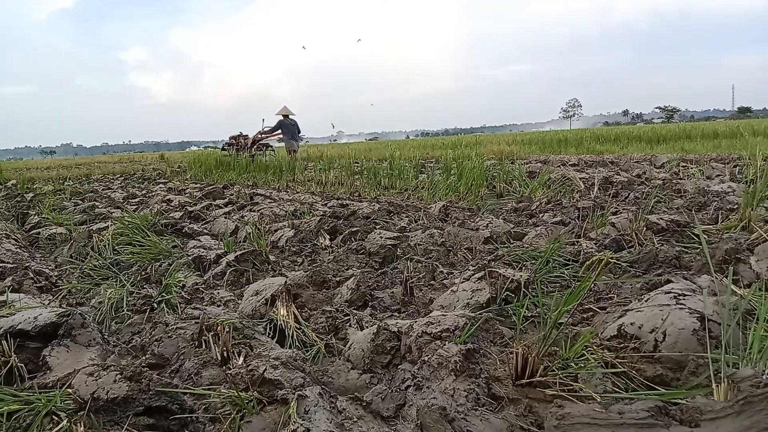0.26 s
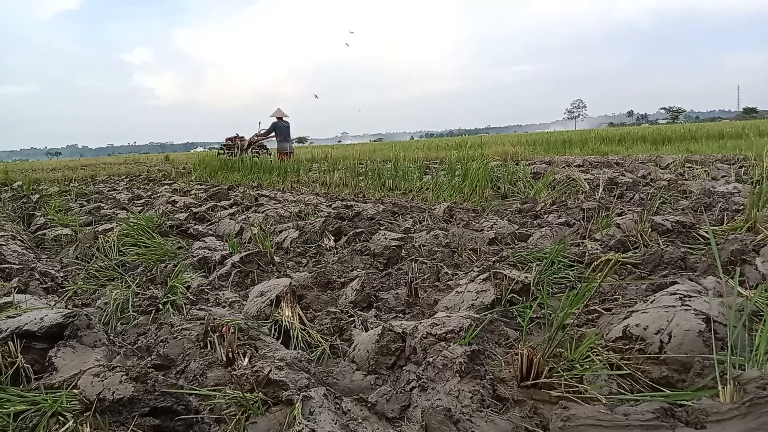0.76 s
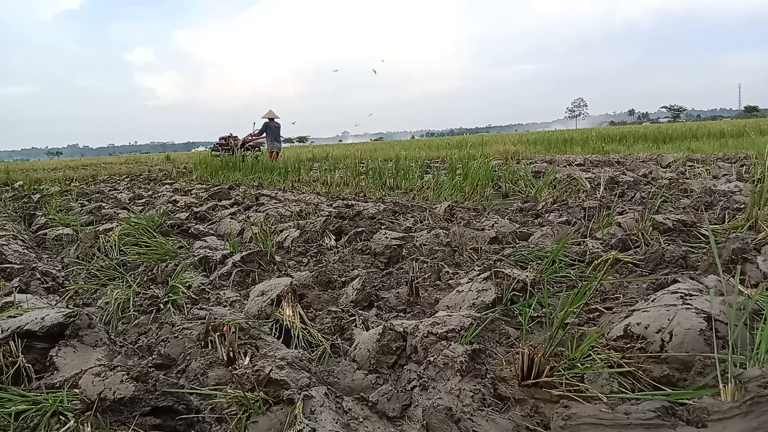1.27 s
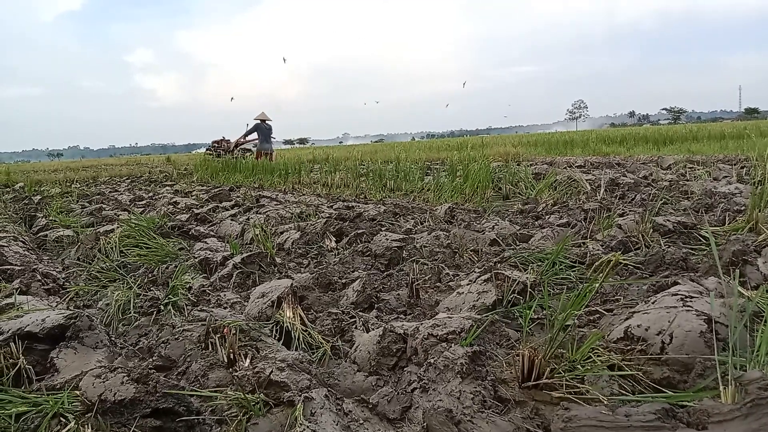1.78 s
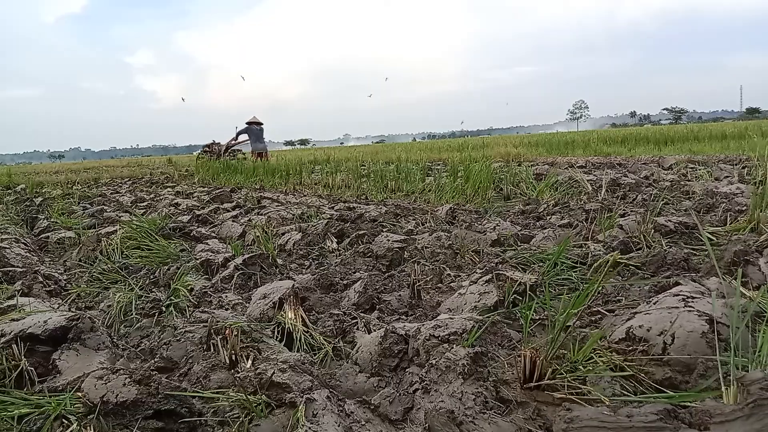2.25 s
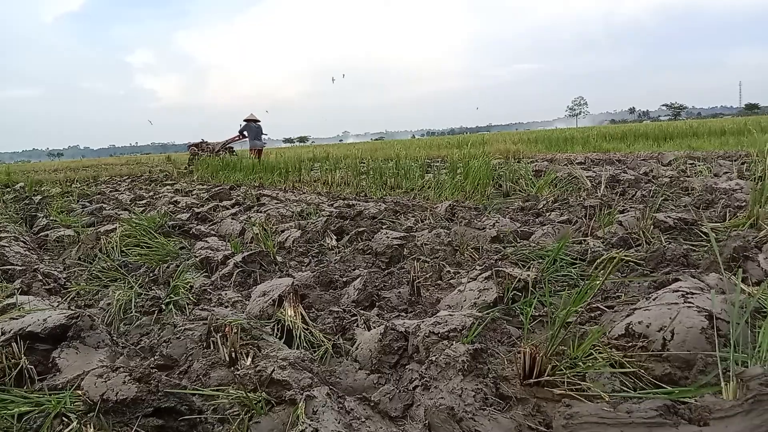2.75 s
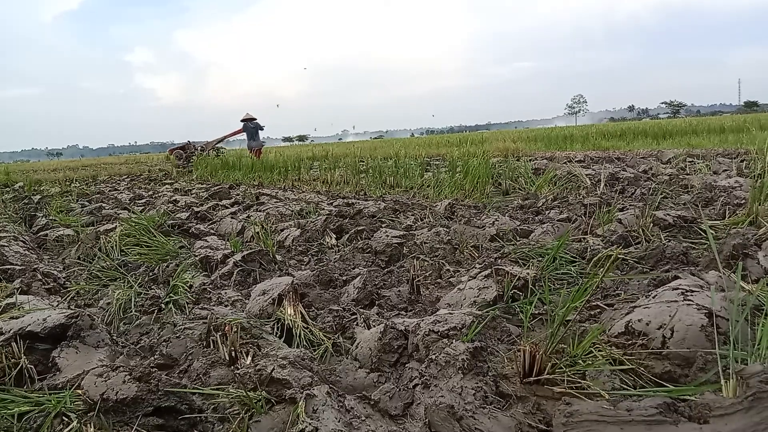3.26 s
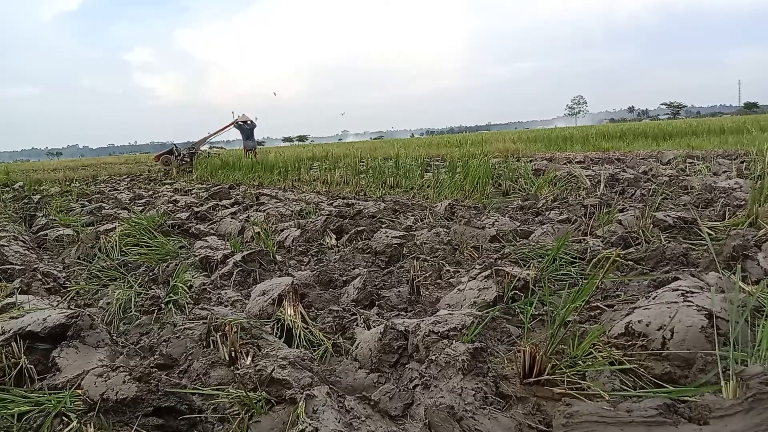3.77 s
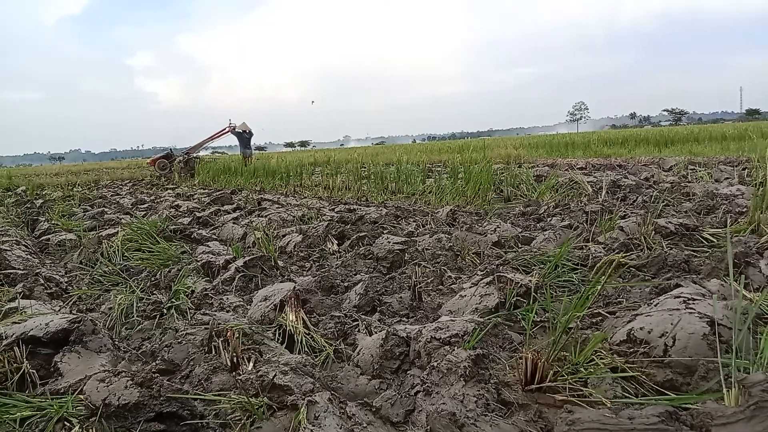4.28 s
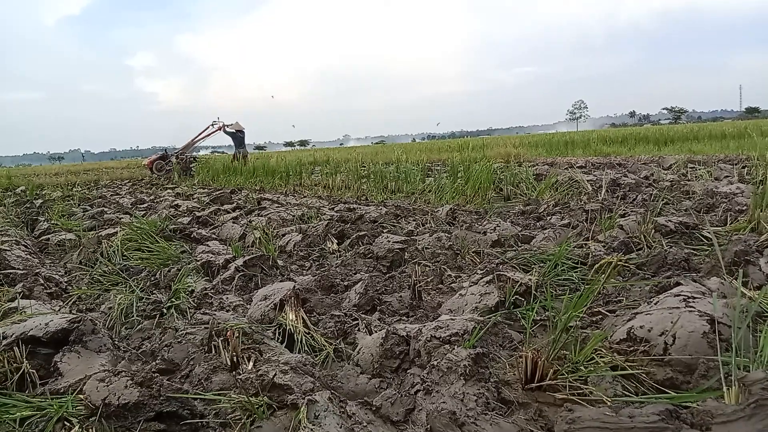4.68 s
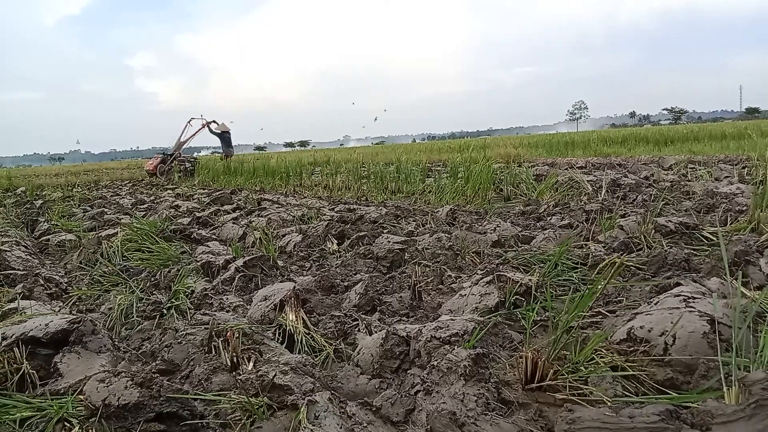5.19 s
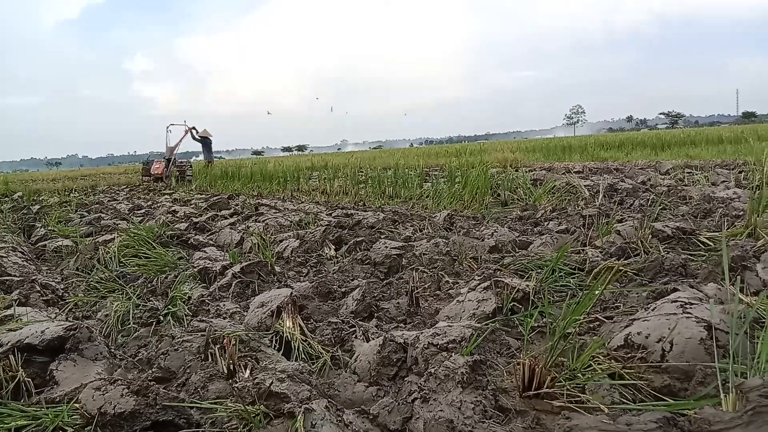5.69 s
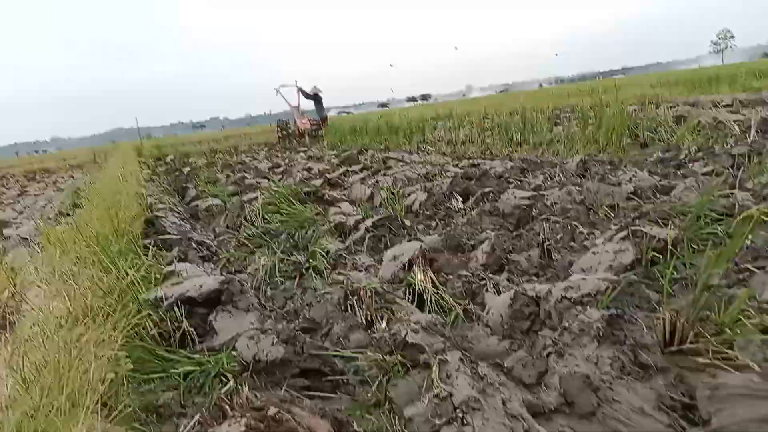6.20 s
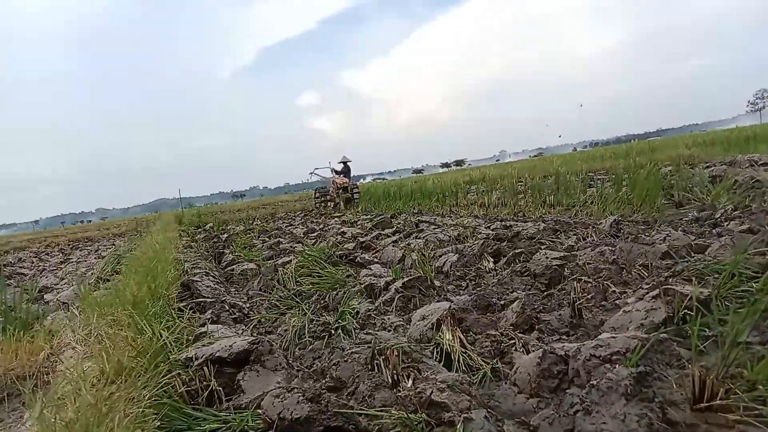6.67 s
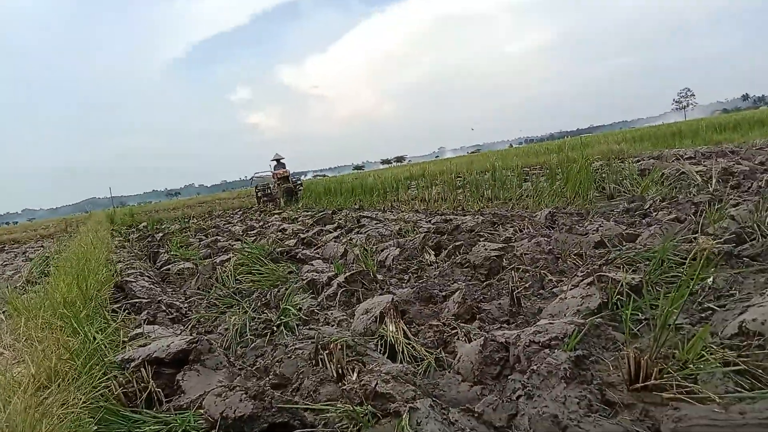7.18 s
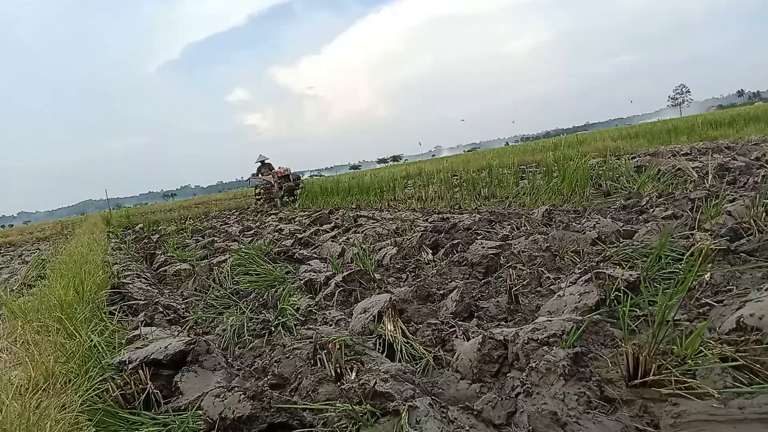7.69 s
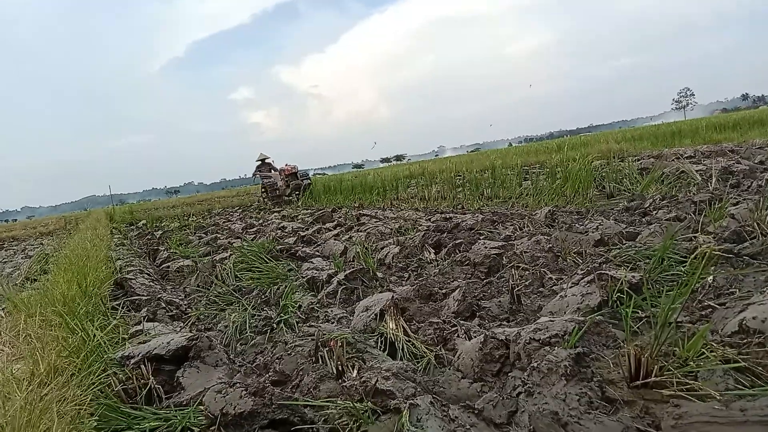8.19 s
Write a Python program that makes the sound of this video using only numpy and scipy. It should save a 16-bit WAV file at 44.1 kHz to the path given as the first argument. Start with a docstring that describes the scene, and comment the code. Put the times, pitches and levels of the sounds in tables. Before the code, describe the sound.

Distant one-cylinder diesel putters with metallic rattle, dips quiet mid-turn and returns louder, while wind thumps the microphone and a cricket chirps faintly.

```python
"""A one-cylinder diesel walk-behind tractor turns at the far end of a muddy field, heard on a hand-held phone.
Firing and exhaust blow-down excite decaying pipe modes; noise bursts at four strokes a cycle ring the metal
parts over a steady gear hum. Wind buffets the microphone as swelling low noise with short pressure pushes,
a cricket chirps in trains of falling tones, and the grip on the phone shifts in a few filtered noise taps.
A faint open-air wash of shaped noise lies beneath."""
import sys
import numpy as np
from scipy import signal
from scipy.fft import rfft, irfft
from scipy.io import wavfile
from scipy.ndimage import uniform_filter1d

SR = 44100
rng = np.random.default_rng(int(sys.argv[2]) if len(sys.argv) > 2 else 0)


def gain_from_db(level_db):
    """Turn a decibel level (scalar or array-like) into a linear amplitude factor."""
    decades = np.asarray(level_db, float) / 20
    return 10 ** decades


def dump(signal):
    """Clip the signal to [-1, 1] and save it as 16-bit WAV at the path in sys.argv[1]."""
    limited = np.clip(np.atleast_2d(signal).T, -1, 1)
    pcm = np.round(limited * 32767).astype(np.int16)
    wavfile.write(sys.argv[1], SR, pcm)


N = 372644
T = np.arange(N) / SR


def columns(table):
    """Linear interpolation: every column of a curve at every sample."""
    s, *cols = np.transpose(table)
    return [np.interp(T, s, c) for c in cols]


def unit(x):
    """Normalization to an rms of 1."""
    return x / np.sqrt(np.mean(x ** 2))


def steady(x):
    """Level compensation: divide out the running rms over a few engine cycles."""
    return x / np.sqrt(uniform_filter1d(x ** 2, SR // 3) + 1e-9)


def band(x, lo_hz, hi_hz, order=2):
    """Band limitation by a Butterworth band-pass."""
    edges_hz = [lo_hz, min(hi_hz, .45 * SR)]
    return signal.sosfilt(signal.butter(order, edges_hz, "bandpass", fs=SR, output="sos"), x)


def walk(rate):
    """Random modulation: levels held 1 / rate s and slewed twice, with a spread near 1."""
    k = int(SR / rate)
    held = np.repeat(rng.standard_normal(N // k + 1), k)
    return 1.163 * uniform_filter1d(uniform_filter1d(held, k), k)[:N]


def crank_bell(cycle, at, spread):
    """Periodic weighting: a Gaussian bell about one crank place (0-1) in every cycle."""
    return np.exp(-((cycle % 1 - at) / spread) ** 2)


def kicks(cycle, place, scatter_db, jitter_s):
    """Impulsive excitation: one impulse a cycle at a crank place, uneven in size and time."""
    s = np.interp(np.arange(1, cycle[-1] + 1) + place, cycle, T, left=-1, right=-1)
    chance = rng.standard_normal((len(s), 2))
    at = ((s + jitter_s * chance[:, 0]) * SR).astype(int)
    keep = (at > 0) & (at < N)
    out = np.zeros(N)
    out[at[keep]] = gain_from_db(scatter_db * chance[keep, 1])
    return out


# engine speed: time_s, firings_per_s
ENGINE_SPEED = [(0.0, 12.146), (1.27, 12.148), (2.04, 10.623), (3.62, 10.579), (4.6, 10.166), (5.5, 10.277),
                (6.18, 10.548), (7.26, 9.691), (7.75, 9.675), (8.45, 9.99)]
CYCLE_AT_START = .68


def crank_cycle():
    """Phase is the integral of rate: engine cycles turned so far, and the slowing in firings per s^2."""
    speed, = columns(ENGINE_SPEED)
    cycle = CYCLE_AT_START + np.cumsum(speed) / SR
    slowing = np.clip(-uniform_filter1d(np.gradient(speed) * SR, SR // 5), 0, None)
    return cycle, slowing


# engine load, under which firing outweighs blow-down: time_s, firing_over_blow_down_db
LOAD = [(0, 6.5), (1.25, 5.5), (1.6, -4), (6.9, 2.5), (8.45, 3.5)]
# modes of the exhaust pipe: pitch_hz, t60_s, swing_after_firing, swing_after_blow_down
PIPE_MODES = [(98, .15, -1.34, -.85), (134, .16, .21, 2.06), (186, .068, 2.18, -1.2), (223, .09, .1, .62),
              (247, .073, -1.24, .29)]
# crank places of the firing and blow-down kicks: place_in_cycle
PIPE_KICK_AT = [-.042, .218]
PUFF_SCATTER_DB, MODE_SCATTER_DB, PIPE_WAVER_DB = 1.8, 3.2, 2.2
# gas still flowing after blow-down: level against the thumps (dB), crank place and spread (0-1)
FLOW_DB, FLOW_AT, FLOW_SPREAD = -4.5, 0.5, 0.3
# the pipe falls quiet just before firing: depth (dB), crank place and spread (0-1)
HUSH_DB, HUSH_AT, HUSH_SPREAD = 7, .89, .05


def exhaust(cycle):
    """Modal response: two pressure kicks a cycle ring the damped pipe modes, over turbulent flow noise."""
    t = T[:SR // 5]
    load_db, = columns(LOAD)
    fire, blow = (kicks(cycle, at, PUFF_SCATTER_DB, 0.00029) * gain_from_db(sign * load_db / 2)
                  for at, sign in zip(PIPE_KICK_AT, (1, -1)))
    thumps = np.zeros(N)
    onset = 1 - np.exp(-t / .001)  # the gas takes a millisecond to arrive
    for hz, t60, after_fire, after_blow in PIPE_MODES:
        decay = np.sin(2 * np.pi * hz * t) * np.exp(-np.log(1000) * t / t60) * onset
        # the outlet swings about, so each mode reaches the ear a little differently
        waver = gain_from_db(PIPE_WAVER_DB * walk(2.99))
        push = gain_from_db(MODE_SCATTER_DB * walk(40)) * (after_fire * fire + after_blow * blow)
        thumps += waver * signal.fftconvolve(push, decay)[:N]
    flow = crank_bell(cycle, FLOW_AT, FLOW_SPREAD) * unit(band(rng.standard_normal(N), 110, 175))
    hush = gain_from_db(-HUSH_DB * crank_bell(cycle, HUSH_AT, HUSH_SPREAD))
    return unit(band(hush * (unit(thumps) + gain_from_db(FLOW_DB) * flow), 39, 316, order=3))


# crank places of firing, exhaust opening, overlap and intake closing: place_in_cycle
STROKE_AT = [-.018, .225, .5, .755]
# knock over the steady rattle (dB), before each part takes its share
FIRE_DB, EXHAUST_VALVE_DB, OVERLAP_DB, INTAKE_VALVE_DB = 15, 12, 4, 6.5
# firing knocks harder under load (dB per dB)
KNOCK_PER_LOAD, KNOCK_DRIFT_DB = .3, 1.5
# less fuel burns while the engine slows: knock lost (dB) per squared slowing in firings per s^2
COAST_DB = 3.5
# each stroke swells fast and dies slower: time to its crest, rise and fall (s)
BURST_PEAK_S, BURST_RISE_S, BURST_FALL_S = .0025, .0014, .0026


def stroke_blows(cycle, slowing):
    """Impact excitation: at each of four strokes, a swell for noise and a knock that repeats every cycle."""
    firing_db = FIRE_DB + KNOCK_PER_LOAD * columns(LOAD)[0] - COAST_DB * slowing ** 2
    fire_db, out_db, in_db = (db + KNOCK_DRIFT_DB * walk(2.047)
                              for db in (firing_db, EXHAUST_VALVE_DB, INTAKE_VALVE_DB))
    t = T[:SR // 20]
    width_s = np.where(t < BURST_PEAK_S, BURST_RISE_S, BURST_FALL_S)
    burst = np.exp(-((t - BURST_PEAK_S) / width_s) ** 2)
    hits = [np.clip(gain_from_db(db) - 1, 0, None) * kicks(cycle, at, 2.1, 0.00061)
            for at, db in zip(STROKE_AT, [fire_db, out_db, OVERLAP_DB, in_db])]
    swells = [signal.fftconvolve(hit, burst)[:N] for hit in hits]
    # the same parts meet on every cycle, so each stroke has one fixed noise shape
    knocks = [signal.fftconvolve(hit, burst * rng.standard_normal(len(t)))[:N] for hit in hits]
    return swells, knocks


# half-widths of skirt and crest of a resonance, as shares of its width
SKIRT, CREST = .65, .25


def peak(x, hz, width_hz):
    """Resonance: a steep band with a sharp crest in its middle, which rings on after a blow."""
    skirt, crest = (signal.butter(order, [max(hz - w, hz / 2), hz + w], "bandpass", fs=SR, output="sos")
                    for order, w in ((3, SKIRT * width_hz), (1, CREST * width_hz)))
    return signal.sosfilt(np.vstack([skirt, crest]), x)


# moments of the turn at which the machine shows another side: time_s
HEADING_S = [.7, 2.2, 3.5, 5.2, 6.2, 7.6]
# the resonances bend up and down: wander of their delay (s), changes per s
SWAY_S, SWAY_PER_S = .0009, 16


def ring(x, modes, waver_db, sway_s):
    """Modal superposition: alternate signs leave notches; levels follow the turn and waver, pitches bend."""
    out = np.zeros(N)
    for k, (hz, width_hz, *heading_db) in enumerate(modes):
        level_db = np.interp(T, HEADING_S[:len(heading_db)], heading_db) + waver_db * walk(14)
        # a steep band answers about 1 / (2 width) s late, so it is moved forward to meet the blow
        mode = unit(np.roll(peak(x, hz, width_hz), -int(SR / (2 * width_hz))))
        if sway_s:
            mode = np.interp(T - sway_s * walk(SWAY_PER_S), T, mode)
        out += (-1) ** k * gain_from_db(level_db) * mode
    return out


def struck_part(cycle, blows, modes, shares, grain_db, rest_db, rest_spread, waver_db, sway_s):
    """Forced vibration: grainy noise swells with a share of each stroke and rings on in one part."""
    swells, knocks = blows
    # both valves rest between overlap and intake closing, and the rattle thins
    rattle = gain_from_db(grain_db * walk(300) - rest_db * crank_bell(cycle, .64, rest_spread))
    swell = rattle + 0.66 * sum(share * stroke for share, stroke in zip(shares, swells))
    knock = 0.72 * sum(share * stroke for share, stroke in zip(shares, knocks))
    drive = rng.standard_normal(N) * swell + knock
    return ring(drive, modes, waver_db, sway_s) * np.std(drive)


# resonances of the engine block: pitch_hz, width_hz, level_db
BLOCK_MODES = [(4333, 377, -13.5), (4629, 122, -12.5), (5000, 456, -7.5), (5446, 423.4, -5),
               (5898, 354.7, -9), (6324, 664, -9.5), (7150, 1150, -17.5), (8630, 1700, -26),
               (10310, 1150, -34)]


def block(cycle, blows):
    """Structure-borne sound: all four strokes shake the block, at pitches that stay put."""
    return struck_part(cycle, blows, BLOCK_MODES, (0.91, 1.1, 0.65, 1.06), 3.07, 3.5, 0.087, 1.93, 0)


# resonances of the covers: pitch_hz, width_hz, level_db at each of six headings
COVER_MODES = [(2362, 286, -12.5, -13.5, -22, -22.5, -32.5, -45),
               (2693, 130, -19.5, -31, -13, -23.5, -27.5, -19.5),
               (3010, 233.4, -8, -15, -31.5, -29, -24, -13.5), (3282, 200, -8.5, -12, -6.5, -14, -24, -67),
               (3756, 469, -10.5, -14, -15, -20, -17.5, -14)]


def covers(cycle, blows):
    """Plate resonance: firing and intake closing ring the covers hardest, and their pitches sway a little."""
    return struck_part(cycle, blows, COVER_MODES, (1.0, 0.55, 0.1, 1.6), 2.25, 10.0, .15, 4.2, SWAY_S / 4)


# resonances of the sheet metal: pitch_hz, width_hz, level_db at each of six headings or one for all
SHEET_MODES = [(10193, 906, -7, -21, -13, -9, -14, 4), (12200, 1900, 0.37), (15000, 950, -1.3),
               (15000, 1500, -1.7)]


def sheet_metal(cycle, blows, level_db):
    """Amplitude modulation: fine treble rattle swells as spent gas hisses on through the exhaust stroke."""
    rattle = struck_part(cycle, blows, SHEET_MODES, (1.2, 0.9, 1.0, 0.1), 3.0, 4.0, .12, 3.0, 0)
    # more gas on some cycles than on others
    outflow = gain_from_db((7.0 + 3.0 * walk(9)) * crank_bell(cycle, .24, 0.22))
    return gain_from_db(level_db + 2.5 * walk(5)) * steady(outflow * rattle)


# resonances of the gearbox: pitch_hz, width_hz, level_db at each of six headings
GEARBOX_MODES = [(810, 1330, -27, -61, -55, -34, -26.5, -46), (1134, 263.4, 0.5, -8, -12, -8.5, -17, -15.5),
                 (1300, 157, 1.5, 4.5, 1, 1.5, -3, -2), (1478, 173.2, -2, -6.5, -5.5, -25, -8, -10.5),
                 (1747, 326, -3.5, -14, -8, -12.5, -17, -15.5)]


def gearbox(cycle, blows, level_db):
    """Forced resonance: gear noise hums in swaying modes, its level held steady over a few cycles."""
    hum = struck_part(cycle, blows, GEARBOX_MODES, (0.21, 0.28, 0.42, 1.5), 1.5, 2.5, 0.11, 2.44, SWAY_S)
    return gain_from_db(level_db) * steady(hum)


# the moving hand shades the port and the treble dips: centre_s, dip_db, length_s
HAND_SHADE = [(6.02, 2, .012), (6.218, 4.5, 0.035), (6.423, 3, 0.016), (6.54, 2, 0.022)]


def clatter(cycle, slowing, gears_db, sheet_db):
    """Superposition: four struck parts sound together; a hand over the port shadows all but the gearbox."""
    blows = stroke_blows(cycle, slowing)
    treble = block(cycle, blows) + covers(cycle, blows) + sheet_metal(cycle, blows, sheet_db)
    dip_db = sum(db * np.exp(-((T - s) / length) ** 2) for s, db, length in HAND_SHADE)
    return gain_from_db(-dip_db) * treble + gearbox(cycle, blows, gears_db)


# loudness of the machine at the phone: time_s, level_db
ENGINE_LEVEL = [(0, -34.5), (.6, -32.5), (1.1, -32), (1.55, -36.5), (2.36, -37.5), (2.7, -41.5),
                (3.0, -39.5), (3.49, -33.5), (4.2, -37.5), (4.9, -42), (5.8, -45), (6.11, -37.5),
                (6.98, -30), (7.29, -33), (7.7, -29.5), (8.45, -28.5)]
# what points at the phone during the turn, over that loudness:
# time_s, exhaust_outlet_db, gearbox_db, sheet_metal_db
FACING = [(0, 8, 5, -10.5), (1.3, 7, 6, -17), (1.8, 0.5, 5.5, -28), (2.65, 3, 2, -24), (2.95, 3, 8, -26),
          (3.6, 4, 1, -30), (4.2, 5, -6, -22.5), (4.9, 8.5, -0.5, -18.5), (5.8, 13, 1.5, -18.5),
          (6.2, 7, 4, -15), (6.7, -3.5, -3, -26), (7.4, 3, -1, -23.5), (8.45, -3, 2, -20.5)]


def engine():
    """Directivity: the balance of exhaust, gears and sheet metal changes as the machine turns."""
    cycle, slowing = crank_cycle()
    level_db, = columns(ENGINE_LEVEL)
    outlet_db, gears_db, sheet_db = columns(FACING)
    return gain_from_db(level_db) * (gain_from_db(outlet_db) * exhaust(cycle) + clatter(cycle, slowing, gears_db, sheet_db))


# spectrum of the open air, before its overall level is set: pitch_hz, density_db (per Hz)
AIR_SPECTRUM = [(40, -7), (110, .1), (400, -30), (800, -29), (2000, -54), (6000, -48), (15000, -50)]
FIELD_DB = -47


def field():
    """Spectral shaping: white noise filtered to a faint open-air wash that flutters with the breeze."""
    hz, db = np.transpose(AIR_SPECTRUM)
    f = np.fft.rfftfreq(N, 1 / SR)
    shape = gain_from_db(np.interp(np.log(f + 1), np.log(hz), db))
    wash = irfft(rfft(rng.standard_normal(N)) * shape, N)
    return gain_from_db(FIELD_DB) * unit(wash * gain_from_db(6.5 * walk(5.3)))


# wind on the microphone: crest_s, rumble_level_db, length_s
GUSTS = [(1.127, -31, 0.12), (1.182, -32, 0.077), (1.314, -21.5, 0.12), (1.453, -19, 0.034),
         (1.412, -15, 0.053), (1.519, -15.5, 0.085), (2.044, -27, 0.077), (2.408, -25.5, 0.095),
         (3.377, -30, 0.073), (3.689, -23, 0.032), (3.883, -20.5, 0.12), (4.044, -36, 0.099),
         (4.689, -17.5, 0.1), (6.187, -34, 0.077), (6.316, -21.5, 0.033), (6.383, -20.5, .077),
         (7.248, -20, 0.16), (7.667, -26.5, 0.071), (7.905, -22, 0.037), (8.047, -24, 0.056),
         (8.201, -22, 0.16), (8.3, -29, 0.18)]
# single eddies that slap the port, before filtering and gain: start_s, level_db, push_s
POPS = [(1.407, -28, .0009), (1.417, -7, 0.00089), (1.511, -7, 0.00037), (3.86, -10.5, 0.00076),
        (3.89, -15, 0.00093), (4.683, -18, 0.00073), (6.384, -10.5, 0.00032), (7.167, -19, 0.0009),
        (7.215, -11, 0.00089), (7.231, -11.5, 0.0009), (7.257, -8, 0.0011), (7.65, -11.5, 0.0016),
        (8.198, -12.5, 0.00093), (8.283, -28, 0.00083)]
# the ragged edge grows with the gust: share at a -15 dB gust (dB), growth (dB per dB)
EDGE_DB, EDGE_SLOPE = -5, 1.2


def wind():
    """Turbulent pressure: gusts are lumpy low rumble, ragged at the crest; eddies pop as short pushes."""
    rumble = band(rng.standard_normal(N), 75.5, 143.0) * gain_from_db(2.0 * walk(50))
    edge = band(rng.standard_normal(N), 164, 446, order=4) * gain_from_db(3.9 * walk(40))
    out = np.zeros(N)
    for s, db, length in GUSTS:
        near = slice(int((s - length) * SR), int((s + length) * SR))
        swell = np.exp(-((T[near] - s) / (0.31 * length)) ** 2)
        # both parts are brought to rms 1 under the swell
        low, high = (x / np.sqrt(np.average(x ** 2, weights=swell ** 2)) for x in (rumble[near], edge[near]))
        ragged = gain_from_db(EDGE_DB + EDGE_SLOPE * (db + 15.0)) * swell * high
        out[near] += gain_from_db(db) * swell * (low + ragged)
    pushes = sum(-gain_from_db(db) * np.exp(-((T - s - .001) / push) ** 2) for s, db, push in POPS)
    return band(out + 1.98 * band(pushes, 85, 1170), 38, 860, order=6)


# first chirp (s), first gap (s), each gap longer by (s), number of chirps
SONG_S, CHIRP_GAP_S, SLOWING_S, SONG_CHIRPS = 3.089, .1195, .0008, 23
# full voice (dB, before a doubling of amplitude), softness at the start (dB), warm-up (s)
SONG_DB, SHY_DB, WARM_UP_S = -51, -10, 0.7
CHIRP_SCATTER_S, WING_SCATTER_DB = .005, 1.2


def cricket():
    """Stridulation: each chirp is a train of 13 wing strokes, and every stroke falls in pitch."""
    out = np.zeros(N)
    t = T[:int(.0062 * SR)]
    stroke = np.hanning(len(t)) * np.sin(2 * np.pi * (9150 * t - 75000 * t ** 2))
    k = np.arange(SONG_CHIRPS)
    since = CHIRP_GAP_S * k + SLOWING_S * k * (k - 1) / 2
    starts = SONG_S + since + CHIRP_SCATTER_S * rng.standard_normal(SONG_CHIRPS)
    voice_db = SONG_DB + SHY_DB * np.exp(-since / WARM_UP_S)
    for s, db, chance in zip(starts, voice_db, rng.standard_normal((SONG_CHIRPS, 13))):
        n = np.arange(len(chance))
        at = ((s + .0081 * n + .0002 * chance) * SR).astype(int)
        swell = np.minimum((n + 2) / 7, 1)  # the first strokes are softer
        out[at] += gain_from_db(db + WING_SCATTER_DB * chance) * swell
    return 2 * signal.fftconvolve(out, stroke)[:N]


# fingers on the phone: start_s, peak_level_db, decay_s, centre_hz, width_hz
FINGERS = [(5.876, -21.5, 0.00073, 7360, 5900), (5.945, -45, .04, 13300, 3500),
           (6.047, -41, 0.054, 12800, 4500), (6.115, -36, .04, 12900, 4500),
           (6.262, -33, 0.041, 12500, 4500), (6.327, -3, 0.017, 5320, 1300),
           (6.33, -30.5, 0.029, 12600, 5000), (6.334, -13, 0.044, 5000, 1610),
           (6.372, -19, 0.013, 4600, 4020), (6.387, -9.5, 0.00085, 2000, 6040)]


def grip():
    """Structure-borne transmission: taps and a short scrape reach the microphone through the case."""
    out = np.zeros(N)
    for (s, db, length, hz, width_hz), noise in zip(FINGERS, rng.standard_normal((len(FINGERS), SR // 4))):
        t = T[:len(noise)]
        push = noise * np.minimum(t / (0.16 * length), 1) * np.exp(-t / length)
        tap = band(push, max(hz - width_hz / 2, 90), hz + width_hz / 2, order=3)
        i = int(s * SR)
        out[i:i + len(t)] += gain_from_db(db) * tap / np.abs(tap).max()
    return out


def scene():
    """Linear superposition: engine, open air, wind, cricket and hands in one channel."""
    return (engine() + field() + wind() + cricket() + grip())[None]


def band_limit(x):
    """A steep low-pass at the top of the band."""
    return signal.sosfilt(signal.butter(12, 16680, fs=SR, output="sos"), x)


def record(dry):
    """Band limitation: the phone cuts the deepest bass and the very top."""
    thin = signal.sosfilt(signal.butter(2, 42, "highpass", fs=SR, output="sos"), dry)
    dull = signal.sosfilt(signal.ellip(8, .3, 60, 15750, fs=SR, output="sos"), thin)
    return band_limit(dull)


dry = scene()
out = record(dry)
dump(out)
```